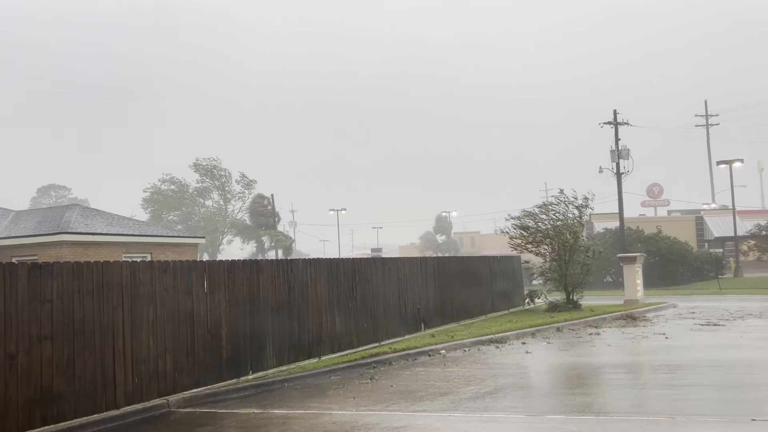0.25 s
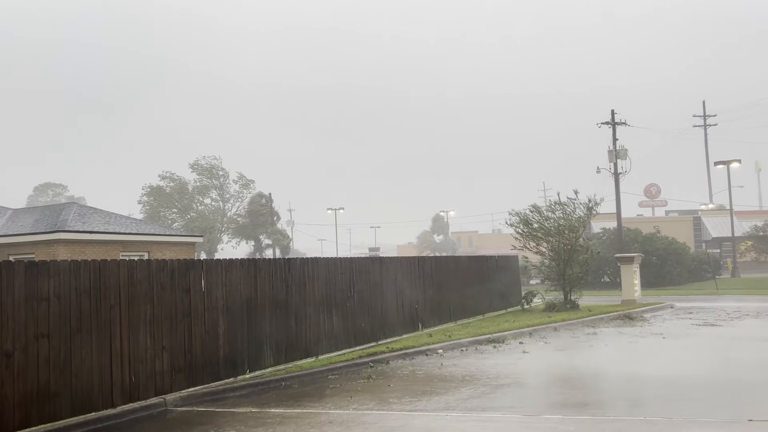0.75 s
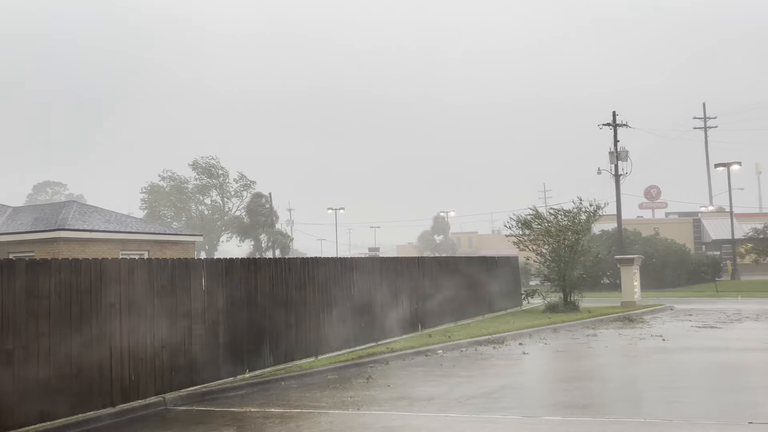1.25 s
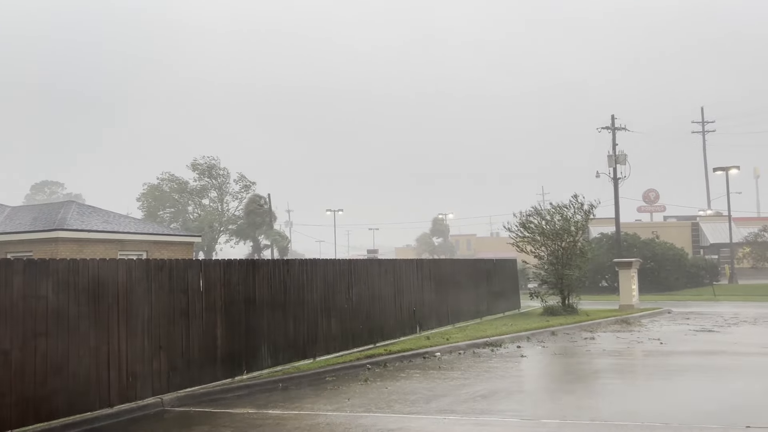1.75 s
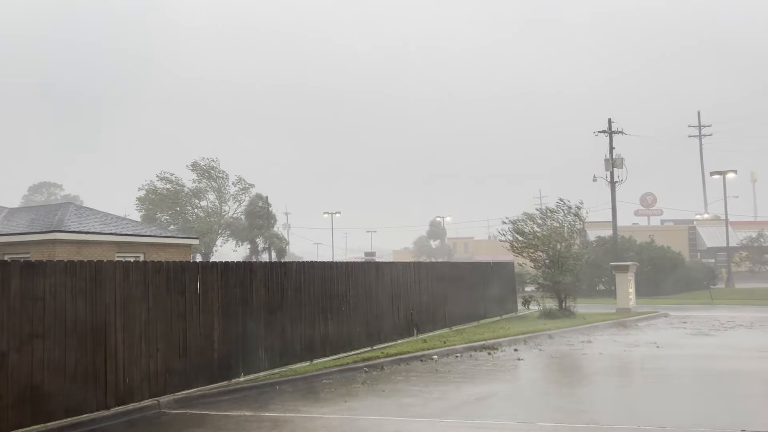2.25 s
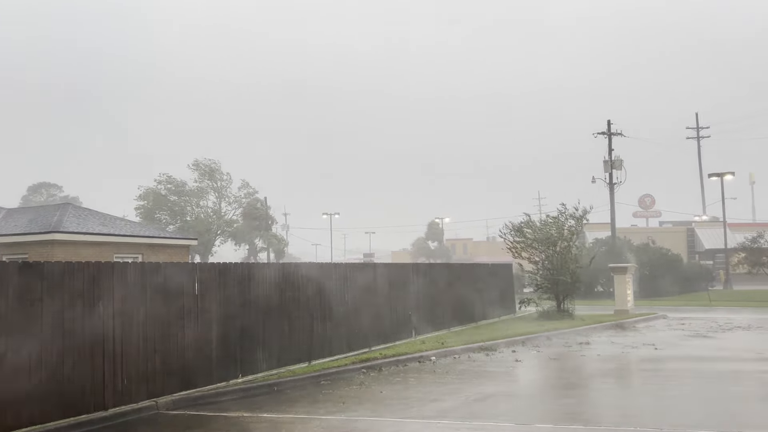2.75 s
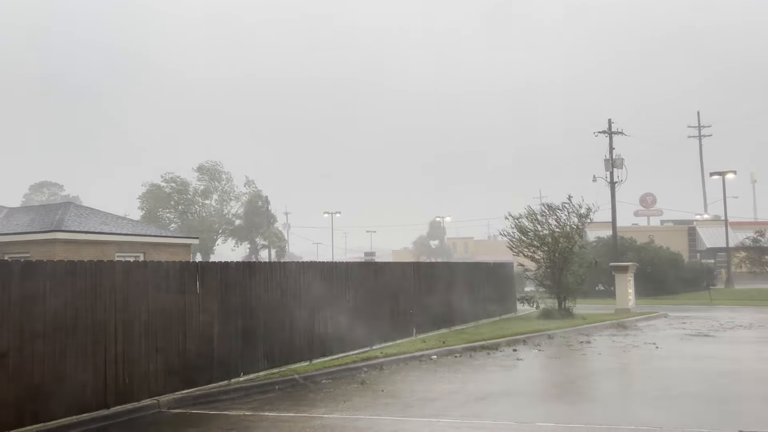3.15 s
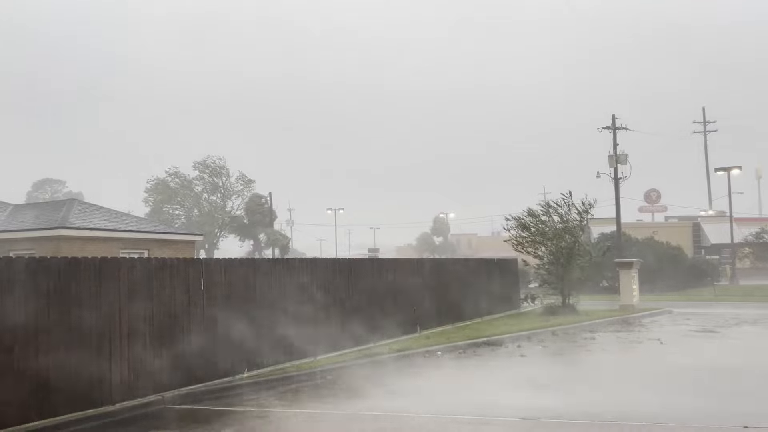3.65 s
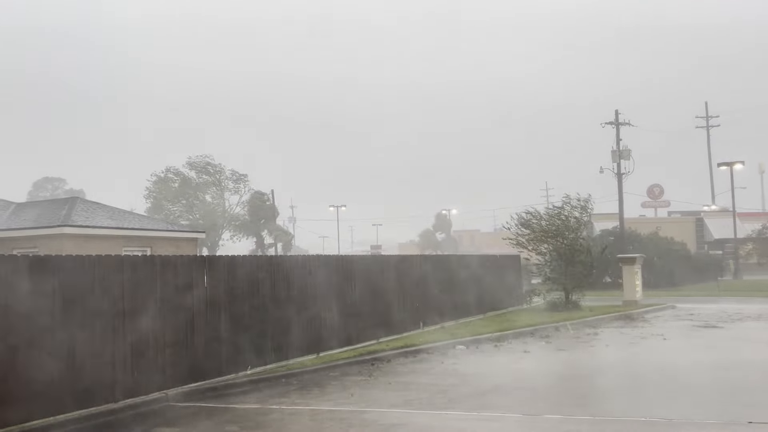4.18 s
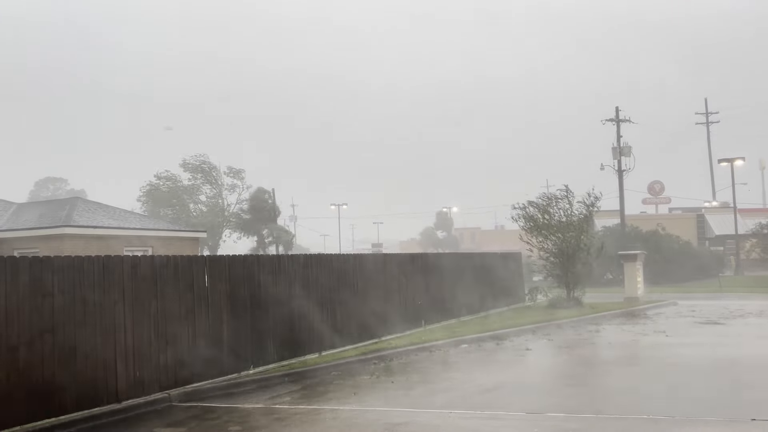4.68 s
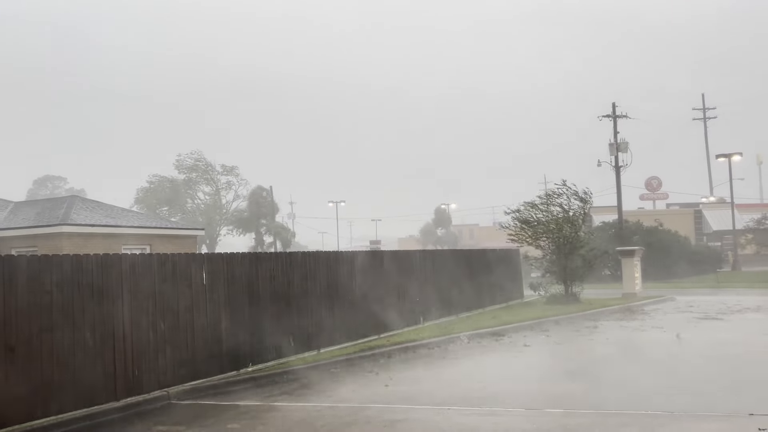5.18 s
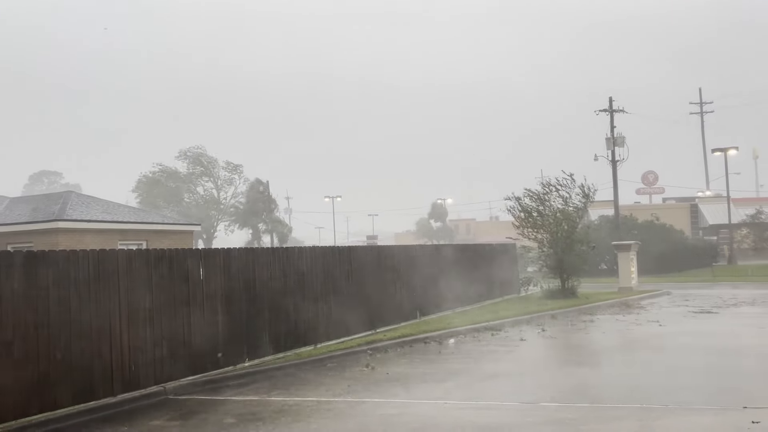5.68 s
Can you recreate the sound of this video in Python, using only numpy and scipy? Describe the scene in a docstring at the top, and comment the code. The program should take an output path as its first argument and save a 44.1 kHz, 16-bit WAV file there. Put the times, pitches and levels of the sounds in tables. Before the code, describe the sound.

Hurricane wind thumps and rasps against a hand-held microphone, peaking in two big gusts, over roaring storm and hissing rain on flooded pavement.

```python
"""Hurricane at the microphone

Hurricane wind and heavy rain over an open parking area, heard by a hand-held camera with two microphone ports.
Gusts and eddies thump, rasp and howl at the ports: flickering noise and bass swings, hardest in two big gusts.
Behind them the storm roars through trees and fence, and rain hisses on the flooded pavement: shaped noise.
A few drops hit the camera itself: filtered impulses that tick and knock."""
import sys
import numpy as np
from scipy import signal
from scipy.fft import rfft, irfft, next_fast_len
from scipy.io import wavfile

SR = 44100
rng = np.random.default_rng(int(sys.argv[2]) if len(sys.argv) > 2 else 0)


def to_wav(s):
    """Save 16-bit WAV."""
    ch = np.atleast_2d(s).T  # columns
    pcm = np.round(np.clip(ch, -1, 1) * 32767)  # PCM
    wavfile.write(sys.argv[1], SR, pcm.astype(np.int16))


N = 261072
HZ = np.fft.rfftfreq(N, 1 / SR)
TIME = np.arange(N) / SR

# Levels in the tables are relative: each layer adds its own trim. A spread is the standard deviation of a bell.
# Wind at the microphone between gusts. Each row: time in seconds, strength in dB.
STEADY_WIND = [(0.0, -37), (0.16, -37), (0.38, -37.5), (0.97, -41), (1.38, -34), (2.23, -37), (2.72, -33.5),
               (3.07, -26), (3.41, -28.5), (3.84, -36.5), (4.06, -39.5), (4.5, -41), (5.03, -44),
               (5.29, -41), (5.44, -30.5), (5.56, -36), (5.7, -49), (5.92, -32)]
# Lulls in that wind. Each row: centre in seconds, spread in seconds.
LULLS = [(0.446, 0.038), (0.836, 0.036), (1.146, 0.014), (1.77, 0.047), (2.215, 0.04), (3.947, 0.022),
         (4.653, 0.077), (5.14, .08), (5.816, .035)]
LULL_DB = -6.5
# Gusts that thump. Each row: peak in seconds, strength in dB, release in seconds, extra rasp in dB.
GUSTS = [(.015, -29.5, .025, 1.5), (.12, -24, 0.09, -7.5), (.7, -39, 0.037, 6.5), (.898, -31, 0.016, 3),
         (.99, -33, 0.058, 1.5), (1.237, -22.5, 0.043, -3.5), (1.37, -33, .04, -1), (1.48, -46, .04, 7),
         (1.625, -30, 0.063, -1.5), (1.918, -24, 0.073, -2.5), (2.131, -27, .04, -2.5),
         (2.29, -31, 0.24, -1), (2.45, -29, 0.051, -0.5), (2.62, -29, 0.027, 0), (2.77, -26.5, 0.053, -0.5),
         (2.859, -19.5, 0.022, -5), (2.93, -32, 0.032, 5.5), (3.145, -16, 0.12, -0.5),
         (3.57, -25.5, 0.05, -2.5), (3.64, -30, 0.02, 3), (4.1, -32, 0.099, 0.5), (4.305, -31, 0.16, 1),
         (4.41, -35, .03, 2.5), (4.47, -31.5, 0.055, -21), (4.756, -27, 0.023, -10), (4.86, -35, .025, -10),
         (5.28, -29, .04, -1), (5.35, -25.5, .05, -0.5), (5.41, -26, 0.039, -6), (5.55, -21.5, 0.092, 1),
         (5.65, -21, 0.067, -3)]
GUST_RISE_S, RASP_LEAD_S = 0.016, 0.0083  # a gust builds quickly; its rasp comes just ahead of its thump
# Eddies that tear across the ports. Each row: peak in seconds, level in dB, spread in seconds, brightness 0-1.
EDDIES = [(0.111, -22.5, 0.0016, 0.2), (0.707, -31, 0.011, 0.1), (.89, -36, 0.0044, 0),
          (1.243, -32, .012, .9), (1.998, -19.5, 0.0035, 0.2), (2.452, -22.5, 0.0053, 0.34),
          (2.594, -24.5, 0.0063, 0.6), (2.8042, -19.5, 0.0016, 0.77), (2.921, -26.5, 0.0042, .6),
          (3.052, -20.5, .0026, 0.34), (3.091, -19, .004, 0.54), (3.119, -14, .003, 0.55),
          (3.131, -13, 0.0052, 0.05), (3.183, -18.5, 0.0046, 0.7), (3.194, -16, 0.0047, 0.8),
          (3.278, -20, 0.0016, 0.87), (3.444, -19.5, 0.002, 1), (3.49, -23.5, 0.0021, 0.7),
          (3.63, -28.5, .005, 1), (5.474, -24.5, 0.0052, 0.64), (5.532, -24, 0.0087, 0.2),
          (5.587, -29.5, .012, .8), (5.643, -17, 0.0033, .1)]
# Gusts straight across the ports. Each row: peak in seconds, level in dB, spread in seconds.
HOWLS = [(1.96, -41, 0.044), (2.445, -27, 0.0075), (3.215, -25, 0.022), (5.35, -47, 0.064),
         (5.634, -25, 0.029)]
# Drops on the camera. Each row: time in seconds, tick peak in dB, casing knock as a share of the tick.
DROP_HITS = [(2.767, -10.5, 0), (2.77, -20, 0), (2.924, -20, 0), (3.137, -13, 0), (4.35, -3.3, .03),
             (4.6045, -5.7, .5), (4.785, -22, 0)]
# Roar in trees and fence. Each row: time in seconds, level in dB.
ROAR_LEVEL = [(0, -42.5), (.9, -40.5), (1.75, -38.5), (1.95, -35.5), (2.9, -40.5), (3.3, -36.5), (3.9, -36),
              (4.3, -32.5), (5.6, -36), (5.92, -36)]
# Rain splashing on the pavement. Each row: time in seconds, level in dB.
SPLASH_LEVEL = [(0.0, -46), (0.13, -45.5), (2.85, -42.5), (3.3, -39), (3.84, -39.5), (5.33, -37.5),
                (5.92, -40)]
# Sheets of fine spray. Each row: time in seconds, level in dB.
SPRAY_LEVEL = [(0.0, -48), (1.02, -45.5), (1.24, -47), (1.6, -46), (2.04, -42.5), (2.85, -45),
               (3.54, -39.5), (4.45, -42), (5.26, -40), (5.62, -43.5), (5.92, -40.5)]

# Spectrum of the thump of pressure swings. Each row: frequency in Hz, relative density in dB per Hz.
THUMP_COLOUR = [(15, -15), (28, -12), (42, -4), (62, 1.5), (85, 0.5), (125, -6), (180, -11), (300, -25),
                (700, -72)]
# Spectrum of the rasp of tearing air. Each row: frequency in Hz, relative density in dB per Hz.
RASP_COLOUR = [(60, -36), (140, 2), (220, 3), (400, -1), (560, -1.5), (780, -1), (1100, 3), (1450, 2),
               (1850, -6.5), (2600, -26), (4000, -14), (5500, -24), (7500, -30), (15000, -47)]
# Spectrum of the crackle of fast air. Each row: frequency in Hz, relative density in dB per Hz.
CRACKLE_COLOUR = [(400, -28), (1300, 0.5), (1900, 6.5), (2800, -3.5), (4200, 4), (5500, -8.5), (7500, -17),
                  (15000, -32)]
# Spectrum of the rasp of a single eddy. Each row: frequency in Hz, relative density in dB per Hz.
EDDY_COLOUR = [(80, -39), (200, 7), (300, -3), (400, -2.5), (550, -9), (750, -2), (1100, 1), (1450, 2),
               (1850, -6.5), (2600, -22), (4000, -33), (7500, -45)]
# Hollow resonance of a port. Each row: frequency in Hz, relative density in dB per Hz.
HOWL_COLOUR = [(700, -40), (950, -16.5), (1200, 5.5), (1450, -0.5), (1800, -5.5), (2500, -28)]
# Spectrum of a drop's tick. Each row: frequency in Hz, relative level in dB.
TICK_COLOUR = [(3000, -30), (7300, -16), (8300, 1), (12500, 0), (14000, -6), (16000, -11)]
# Spectrum of the casing's knock. Each row: frequency in Hz, relative level in dB.
KNOCK_COLOUR = [(500, -20), (1300, 0), (2600, -11), (4200, 1), (5500, -8), (8000, -22)]
# Spectrum of the roar. Each row: frequency in Hz, relative density in dB per Hz.
ROAR_COLOUR = [(50, -12.5), (200, -17), (420, -16.5), (710, -28.5), (820, -7), (980, 1.5), (1130, 0),
               (1400, -1), (1750, -5.5), (2100, -12), (2700, -21.5), (5000, -37)]
# Spectrum of the splashing. Each row: frequency in Hz, relative density in dB per Hz.
SPLASH_COLOUR = [(1200, -11.5), (2500, -10.5), (3300, -6), (4100, -0.5), (4700, -0.5), (5400, -5.5),
                 (6200, -8), (7200, -15.5), (8000, -8.5), (12000, -27)]
# Spectrum of the spray. Each row: frequency in Hz, relative density in dB per Hz.
SPRAY_COLOUR = [(5000, -64), (7800, -22.5), (8050, -0.5), (9500, 1.5), (11000, 2), (12300, -0.5),
                (13500, -5), (14500, -6), (15700, -16)]

# What the two ports do not share. Each row: frequency in Hz, level in dB relative to the shared part.
PORT_WIDTH = [(60, -102), (700, -90), (950, -18), (1150, -10), (1400, 4.5), (1750, -7), (3200, -5.5),
              (4300, -4), (5300, -0.5), (6400, -4), (8200, -18), (12500, -73), (14500, -9)]
# Phase between the ports. Each row: frequency in Hz, radians by which left leads.
PORT_LEAD = [(1000, 0), (1250, .1), (1480, -1.8), (1750, .5), (3400, .8), (5000, .6), (5500, -1.9),
             (6400, -.2), (7400, -.2), (8200, -1.2), (9900, -3.1), (11500, -4.7), (12600, -6.2),
             (13400, -6.4), (14000, -7.5), (15500, -9.4)]
# Balance of the ports. Each row: frequency in Hz, left minus right in dB.
PORT_BALANCE = [(1100, 0), (1480, -2.2), (1750, 5), (2400, 2.7), (3500, 1), (5200, -.4), (7000, 0)]
CEILING = .85  # amplitude that the soft rounding approaches
EDGE_HZ = 15750  # top of the recorder's band


def wind(steepness=1.63):
    """Pressure swings thump the microphone; air tearing past rasps in short spurts and crackles when it is fast."""
    buffeting, tearing = airflow()
    thump = gain_of(-0.5) * buffeting * rush(THUMP_COLOUR, depth_db=1.5, rate_hz=17.0)
    rasp_noise = mottle(rush(RASP_COLOUR, depth_db=2.5, rate_hz=147), patch_db=2.0)
    rasp = gain_of(-33.0) * tearing * rasp_noise
    crackle_noise = patter(CRACKLE_COLOUR, per_s=110, spread_db=2.2, decay_s=0.00083)
    crackle = gain_of(-46.0) * evened(tearing ** steepness) * crackle_noise
    return thump + rasp + crackle


def airflow(lump_db=1.5, lumps_hz=12, rasp_power=0.88):
    """Strength of thump and rasp: lumpy wind that sinks in lulls, plus gusts that rise quickly and die away."""
    calm = sum(bell(s, spread) for s, spread in LULLS)
    lumps = gain_of(0.3 + lump_db * flutter(lumps_hz) + LULL_DB * calm)
    thump_power = (lumps * follow(STEADY_WIND)) ** 2
    tear_power = thump_power ** rasp_power
    for s, db, release, extra_db in GUSTS:
        near = abs(TIME - s) < 10 * release
        age = TIME[near] - s
        rise_and_fall = np.exp(np.where(age < 0, -.5 * (age / GUST_RISE_S) ** 2, -age / release))
        power = (gain_of(db) * rise_and_fall) ** 2
        thump_power[near] += power
        tear_power[near] += gain_of(extra_db) ** 2 * power ** rasp_power
    tearing = np.interp(TIME + RASP_LEAD_S, TIME, np.sqrt(tear_power))
    return np.sqrt(thump_power), evened(tearing)


def eddies(swing_hz=62, swing_s=0.017, push_db=-13):
    """Each eddy is a burst of rasp, with as much crackle as it is bright; its push of air swings in the bass."""
    burst, edge, push = np.zeros((3, N))
    detunes = rng.uniform(0.76, 1.28, len(EDDIES))  # every push swings at its own pitch
    for (s, db, spread, bright), detune in zip(EDDIES, detunes):
        shape = gain_of(db) * bell(s, spread)
        burst += shape
        edge += np.clip(bright, 0, 1) * shape
        near = abs(TIME - s) < 20 * swing_s
        age = np.maximum(TIME[near] - s + spread, 0)
        swell = age / swing_s * np.exp(1 - age / swing_s)
        push[near] += gain_of(db + push_db) * swell * np.sin(2 * np.pi * swing_hz * detune * age)
    rasp = gain_of(-1.0) * burst * rush(EDDY_COLOUR, depth_db=4.0, rate_hz=640)
    crackle = gain_of(-4.0) * edge * rush(CRACKLE_COLOUR, depth_db=4.0, rate_hz=270)
    return rasp + crackle + push


def howls():
    """Air blowing across a port excites its broad, hollow resonance."""
    swell = sum(gain_of(db) * bell(s, spread) for s, db, spread in HOWLS)
    return swell * rush(HOWL_COLOUR, depth_db=1.0, rate_hz=150)


def hits():
    """A drop on the camera makes a dry, high tick; a square hit also knocks on the casing."""
    tick, knock = click(TICK_COLOUR), click(KNOCK_COLOUR)
    drops = np.zeros((2, N))
    for s, db, share in DROP_HITS:
        drops += gain_of(db) * np.roll(tick + share * knock, round(s * SR), axis=1)
    return drops


def storm():
    """The roar in trees and fence, rain splashing on the pavement, and sheets of fine spray blown off it."""
    roar_noise = rush(ROAR_COLOUR, depth_db=1.4, rate_hz=34, diffuse_db=-21)
    roar = gain_of(0.5) * follow(ROAR_LEVEL) * mottle(roar_noise, patch_db=0.85)
    wash = gain_of(1.5) * mottle(rush(SPLASH_COLOUR, depth_db=-0.6, rate_hz=45), patch_db=2.0)
    drops = gain_of(-4.0) * patter(SPLASH_COLOUR, per_s=600, spread_db=-1.0, decay_s=0.0026)
    mist = gain_of(4.0) * mottle(rush(SPRAY_COLOUR, depth_db=.5, rate_hz=11), patch_db=1.0)
    droplets = gain_of(0.5) * patter(SPRAY_COLOUR, per_s=1100, spread_db=2.0, decay_s=0.0011)
    return roar + follow(SPLASH_LEVEL) * (wash + drops) + follow(SPRAY_LEVEL) * (mist + droplets)


def rush(spectrum, depth_db, rate_hz, diffuse_db=-80):
    """Turbulent noise whose strength flutters from moment to moment."""
    noise = rng.standard_normal((2, N)) * gain_of(depth_db * flutter(rate_hz))
    return at_ports(noise, spectrum, diffuse_db)


def patter(spectrum, per_s, spread_db, decay_s):
    """Many small noise bursts at random times and of uneven size, each starting at once and dying quickly."""
    starts = rng.random(N) < per_s / SR
    size = gain_of(spread_db * np.minimum(rng.exponential(1, N), 5)) * starts
    power = signal.lfilter([1], [1, -np.exp(-2 / (decay_s * SR))], size ** 2)
    return at_ports(np.sqrt(power) * rng.standard_normal((2, N)), spectrum)


def click(spectrum):
    """One impulse as the two ports hear it, with a peak of 1."""
    sound = at_ports([signal.unit_impulse(N), np.zeros(N)], spectrum)
    return sound / abs(sound).max()


def mottle(sound, patch_db):
    """Passes noise through short-lived patches of gain, so that its colour keeps shifting."""
    z = signal.stft(sound, nperseg=1024, noverlap=768)[2]
    patched = z * patches(patch_db)[:, :z.shape[2]]
    return evened(signal.istft(patched, nperseg=1024, noverlap=768)[1][:, :N])


def patches(patch_db, width_hz=220, length_s=0.037):
    """Random short-lived patches of gain over frequency bins and time frames: white noise, blurred both ways."""
    field = rng.standard_normal((513, next_fast_len(N // 256 + 2)))
    bins = np.fft.fftfreq(513, SR / 1024)[:, None]
    frames = np.fft.fftfreq(field.shape[1], 256 / SR)
    blur = np.exp(-2 * ((bins * width_hz) ** 2 + (frames * length_s) ** 2))
    return gain_of(patch_db * evened(np.fft.ifft2(np.fft.fft2(field) * blur).real))


def at_ports(pair, spectrum, diffuse_db=-80):
    """Colours and blends two signals: alike in the bass, widest in the middle, narrower but skewed in the treble."""
    shared, apart = rfft(pair, axis=1)
    width = gain_of(np.maximum(read(PORT_WIDTH), diffuse_db))  # sound from all around is never quite mono
    tilt = gain_of(read(PORT_BALANCE) / 2) * np.exp(.5j * read(PORT_LEAD))
    left, right = (shared + width * apart) * tilt, (shared - width * apart) / tilt
    ports = np.array([left, right]) / np.sqrt(1 + width ** 2)
    return evened(irfft(ports * gain_of(read(spectrum)), N, axis=1))


def flutter(rate_hz):
    """Random wander of rms 1, fading out above the rate and at its slowest."""
    band = 1 / (1 + (HZ / rate_hz) ** 4) * HZ / (HZ + rate_hz / 4)
    return evened(irfft(rfft(rng.standard_normal(N)) * band, N))


def bell(s, spread_s):
    """A smooth swell of height 1 around the time s."""
    swell, near = np.zeros(N), abs(TIME - s) < 10 * spread_s
    swell[near] = np.exp(-.5 * ((TIME[near] - s) / spread_s) ** 2)
    return swell


def follow(rows):
    """A dB curve as a gain over time."""
    return gain_of(np.interp(TIME, *np.transpose(rows)))


def read(points):
    """A table over frequency, joined by straight lines on a log axis."""
    hz, value = np.transpose(points)
    return np.interp(np.log(HZ + 1), np.log(hz + 1), value)


def evened(x):
    """Scales to rms 1."""
    return x / np.sqrt(np.mean(x ** 2) + 1e-20)


def gain_of(db):
    """Decibels to amplitude."""
    return 10 ** (np.asarray(db) / 20)


def scene():
    """Wind on the microphone and drops on the camera, in front of the storm."""
    return wind() + eddies() + howls() + hits() + storm()


def record(dry):
    """The hardest blows round off softly at the recorder's ceiling; then its band limit."""
    held = dry / np.sqrt(np.sqrt(1 + np.square(np.square(dry / CEILING))))
    low_pass = signal.firwin(511, EDGE_HZ, window=("kaiser", 9), fs=SR)
    return signal.oaconvolve(held, low_pass[None], "same", axes=1)


dry = scene()
out = record(dry)
to_wav(out)
```